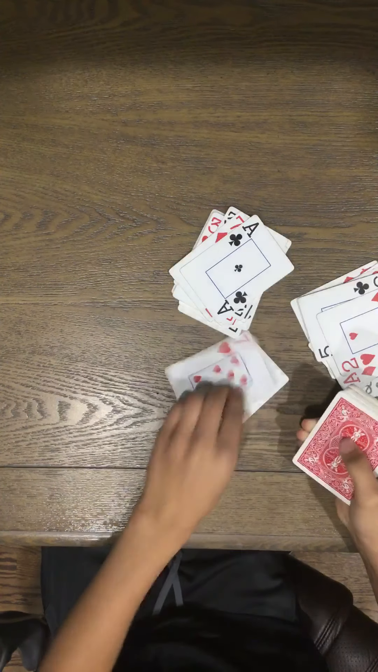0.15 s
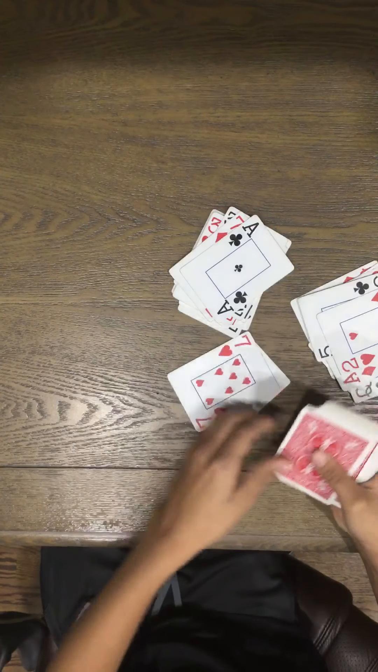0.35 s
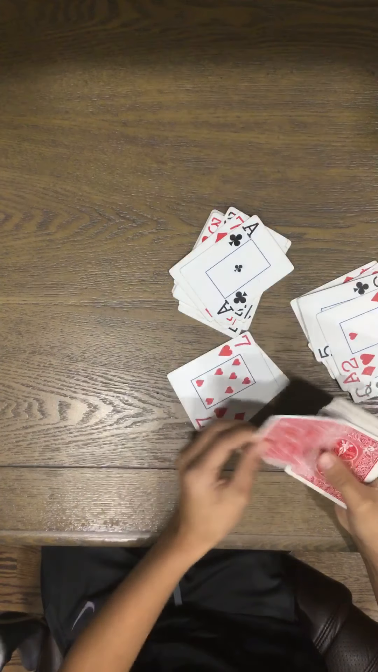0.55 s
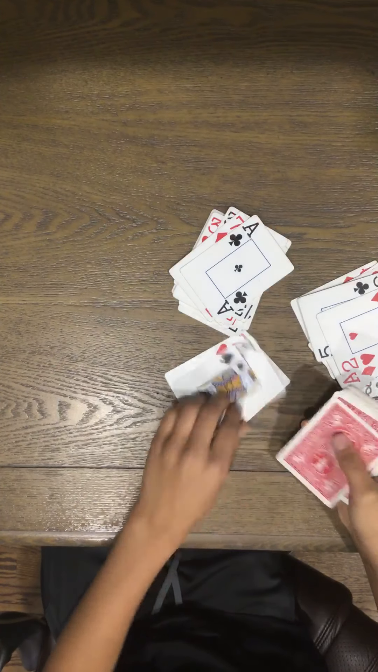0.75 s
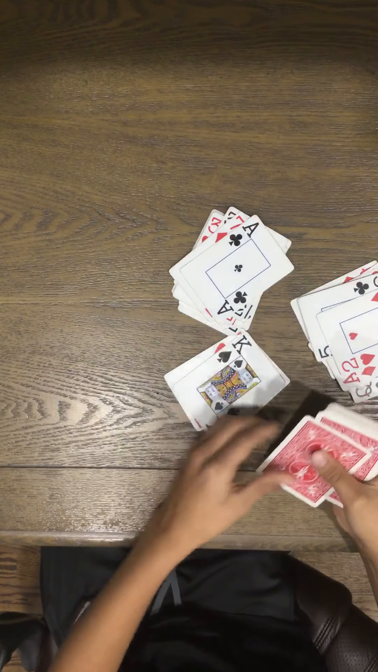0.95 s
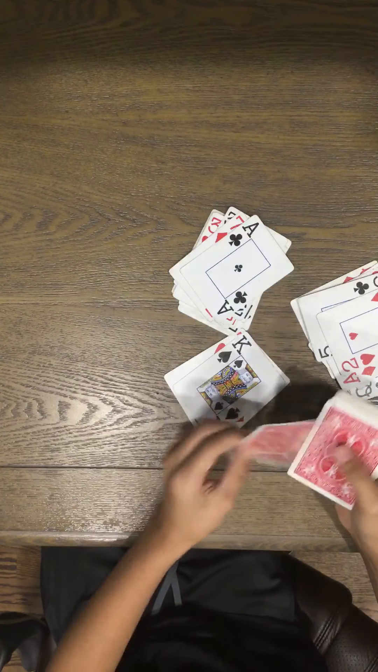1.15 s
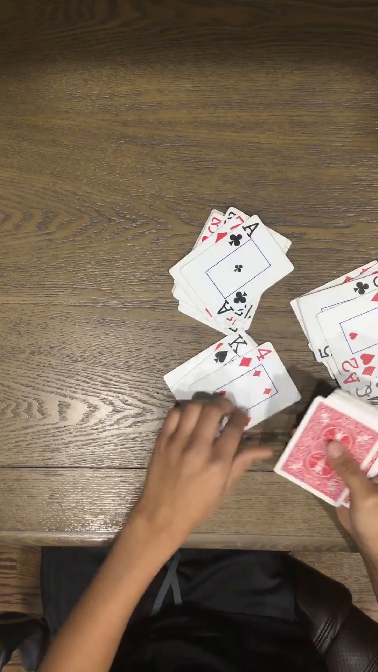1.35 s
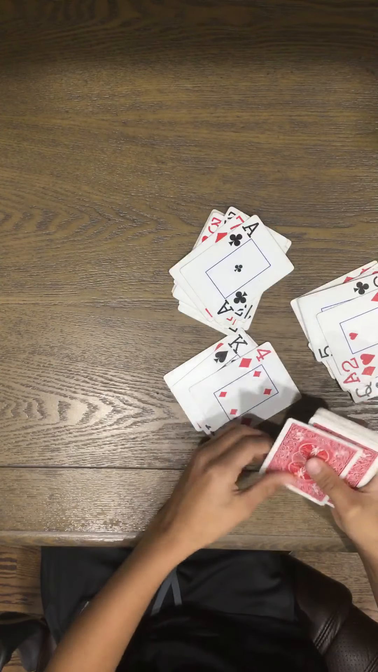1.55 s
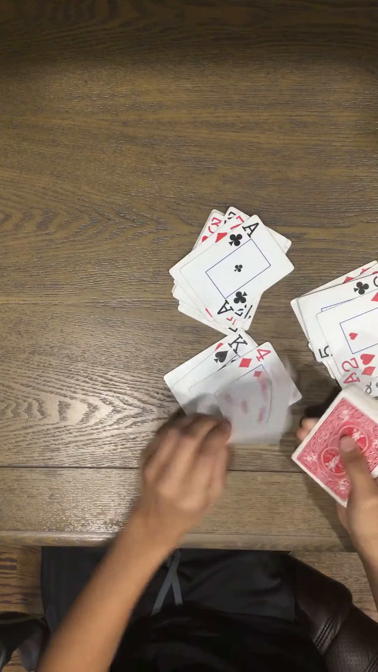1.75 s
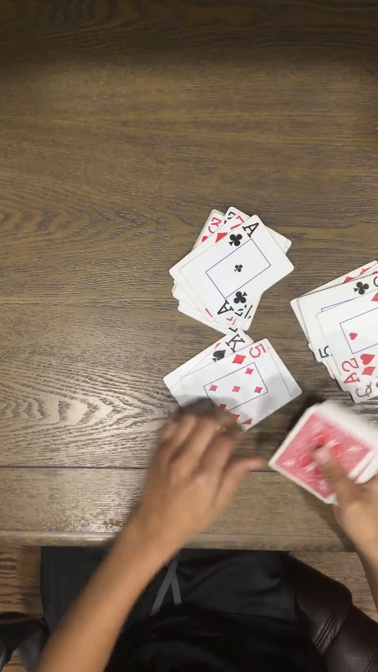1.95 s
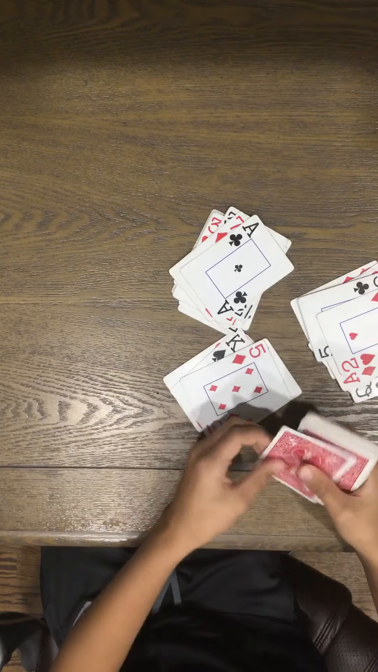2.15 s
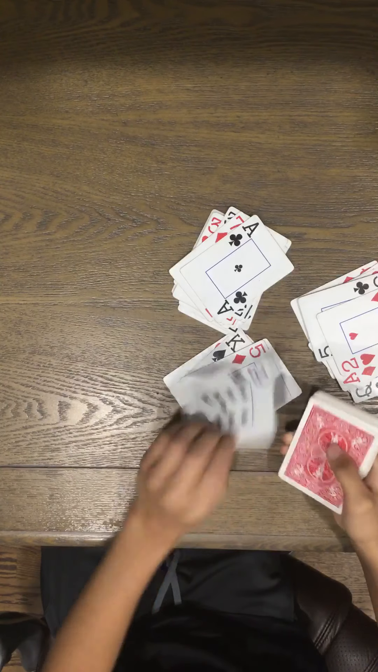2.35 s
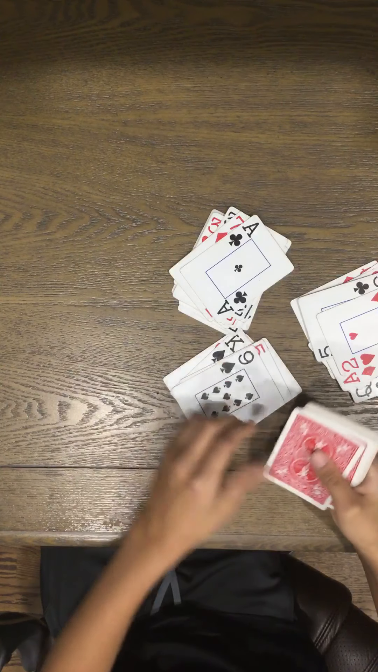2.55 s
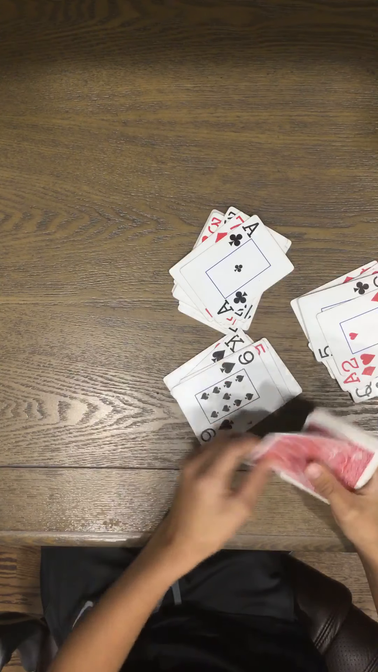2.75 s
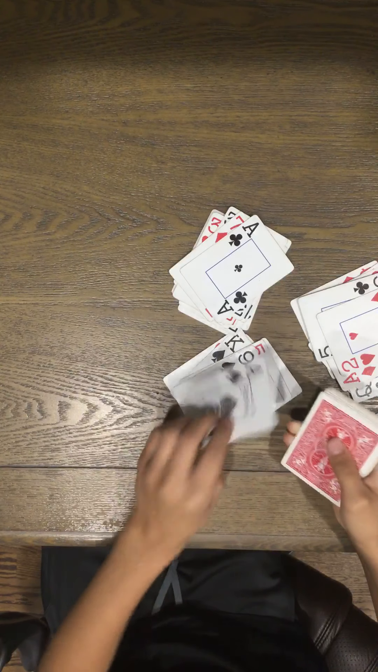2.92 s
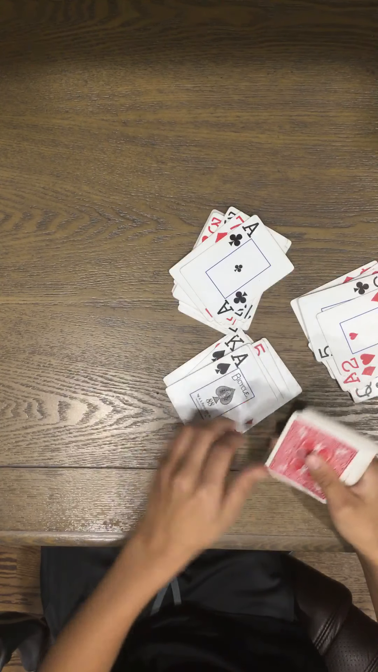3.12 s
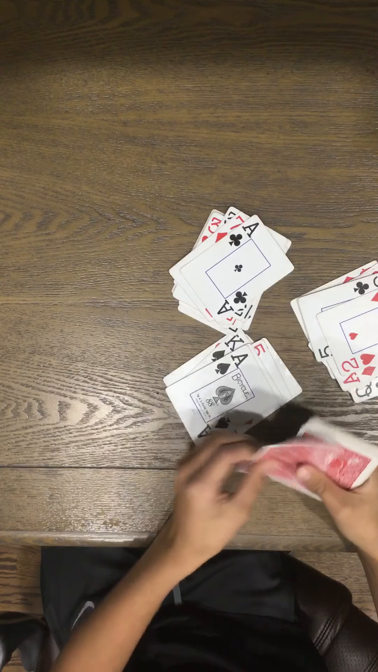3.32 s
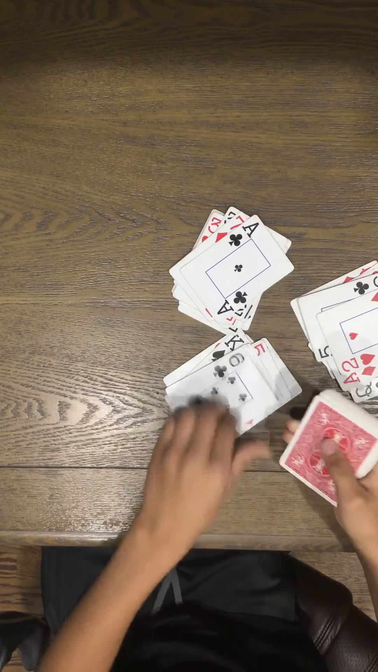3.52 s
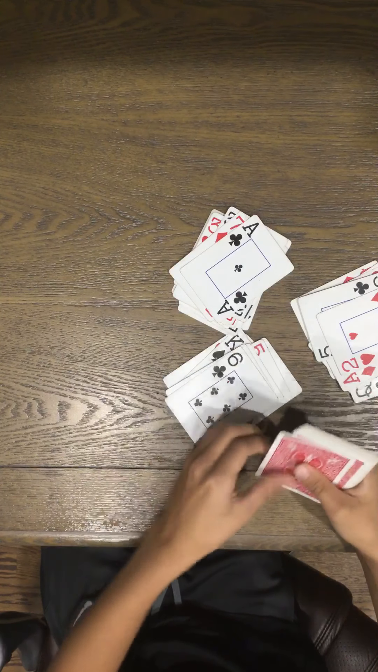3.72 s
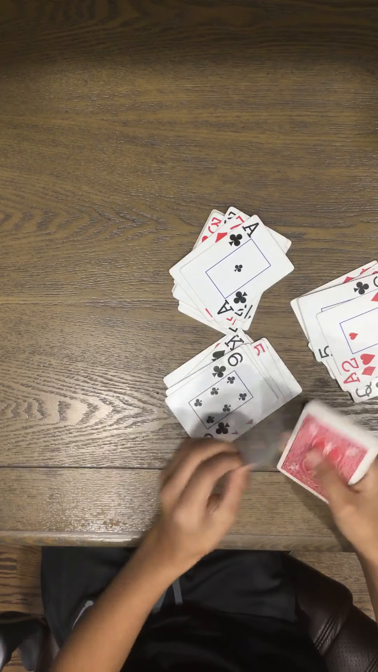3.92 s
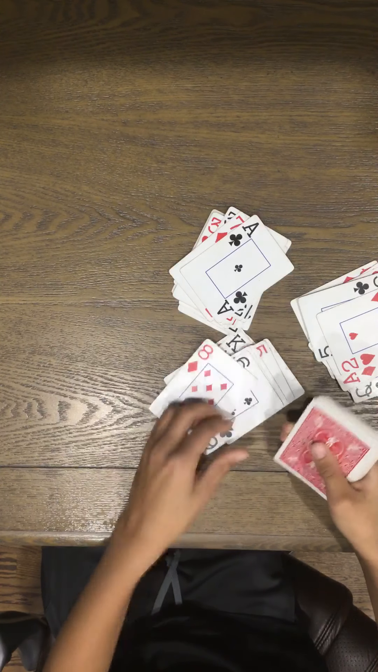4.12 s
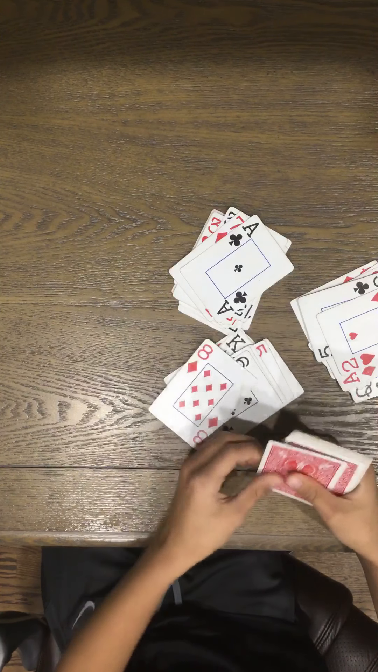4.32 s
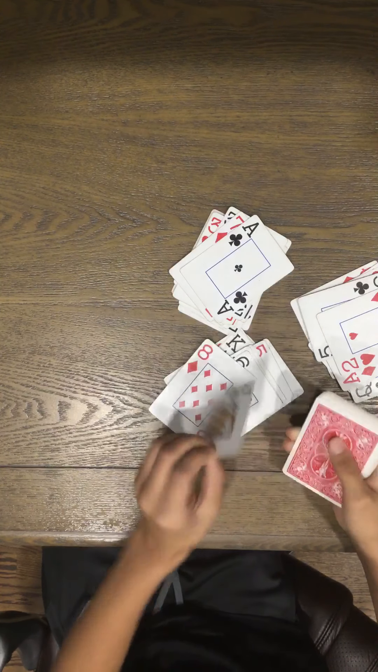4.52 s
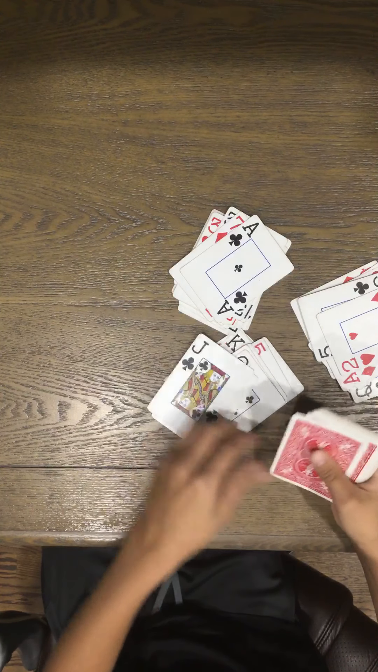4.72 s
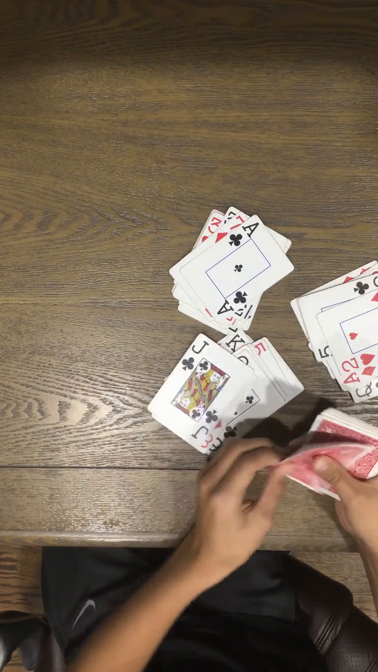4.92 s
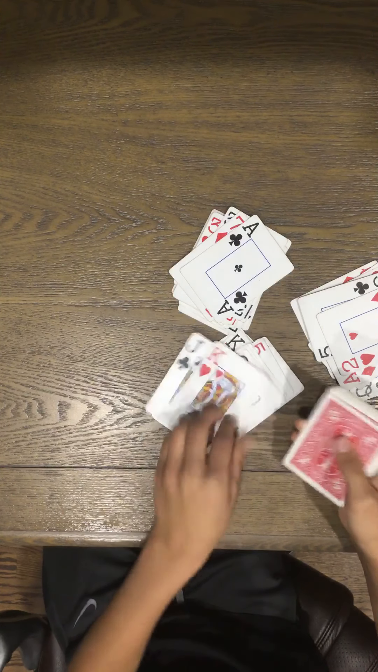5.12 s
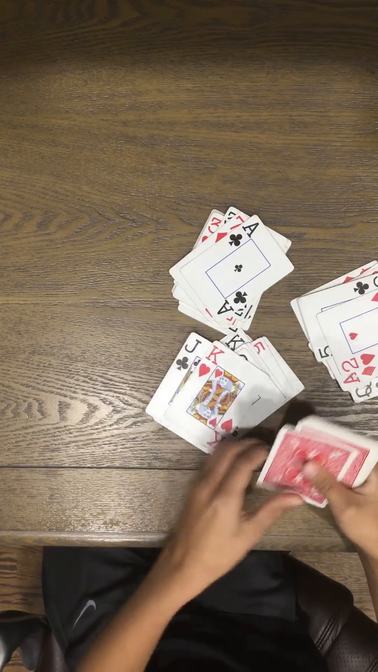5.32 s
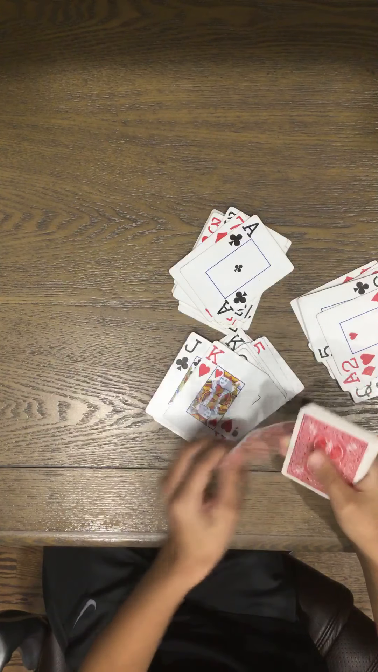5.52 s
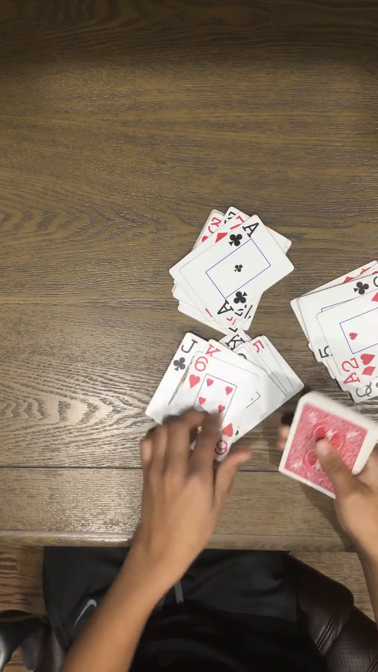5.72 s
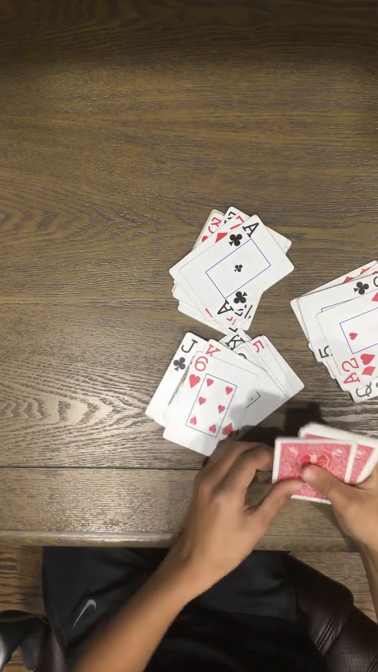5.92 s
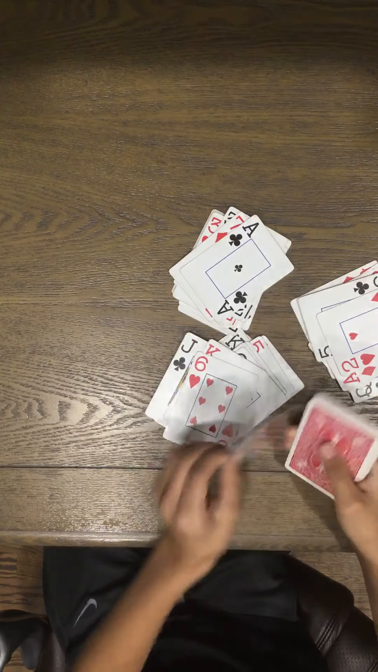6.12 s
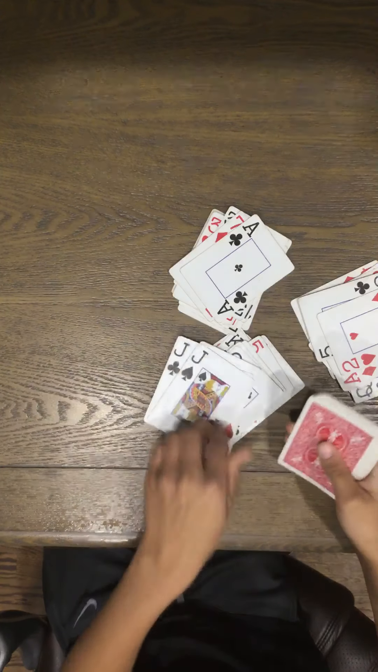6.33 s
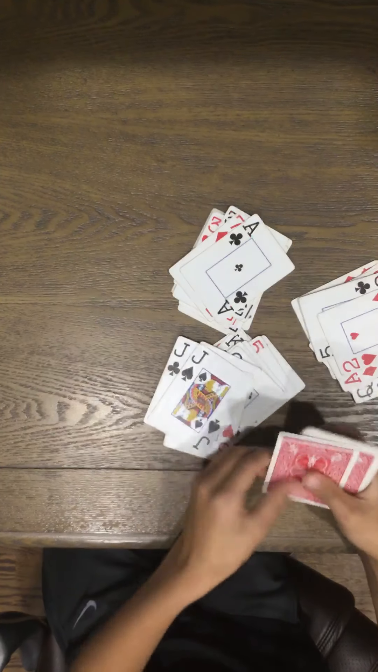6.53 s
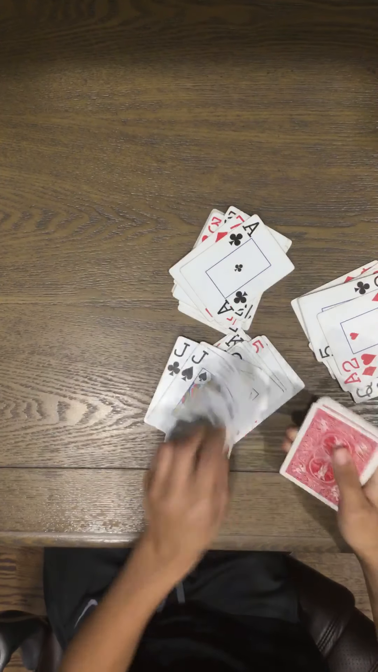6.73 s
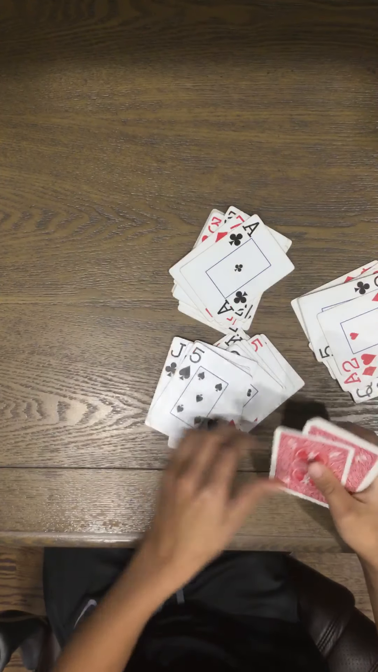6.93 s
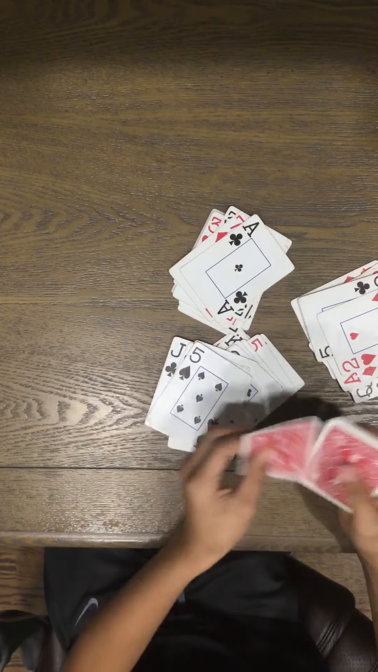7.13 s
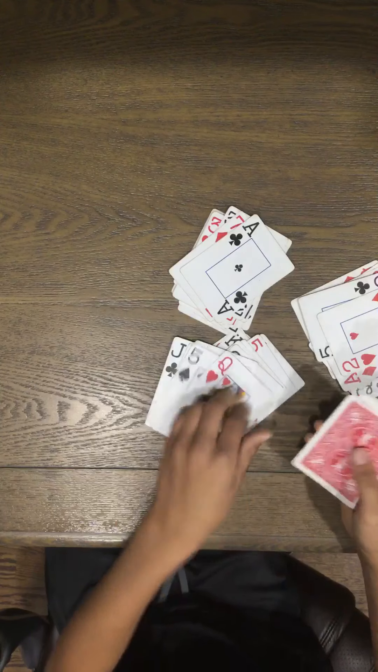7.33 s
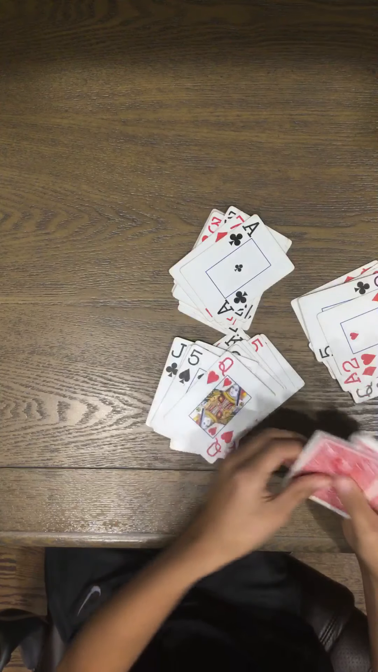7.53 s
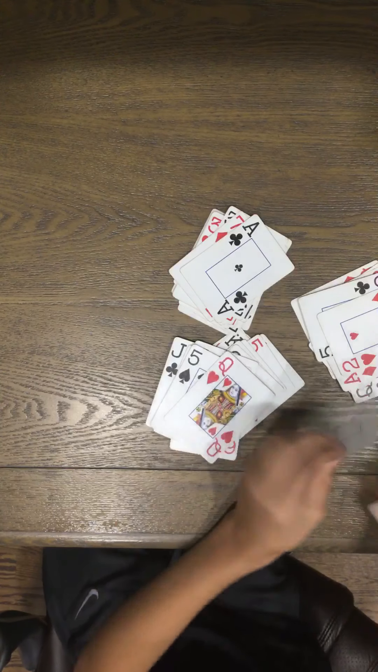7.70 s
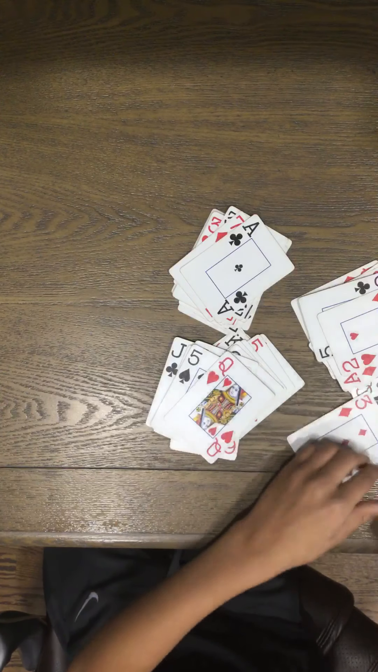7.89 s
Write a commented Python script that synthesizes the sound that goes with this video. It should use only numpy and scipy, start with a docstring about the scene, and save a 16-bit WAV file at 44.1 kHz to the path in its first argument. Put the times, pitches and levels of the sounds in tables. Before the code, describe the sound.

Playing cards are dealt one by one onto a wooden table, sliding, flicking and slapping down with soft finger thumps over a faint hum.

```python
"""A low hum fills a small quiet room, where playing cards are dealt one by one onto a wooden table.
First the thumb ticks on the deck. The top card slides off with a hiss, bends and flicks free,
nudging the table. Next its edge clicks against the pile, its face slaps down and its corner snaps.
Right behind it the fingers thump the table top, which rings briefly as the room's echo dies away."""
import sys
import numpy as np
from scipy import signal
from scipy.fft import rfft, irfft
from scipy.io import wavfile
from scipy.ndimage import uniform_filter1d

SR = 44100
rng = np.random.default_rng(int(sys.argv[2]) if len(sys.argv) > 2 else 0)


def materialize(psi):
    """Save the field psi as 16-bit PCM at rate SR to the path in sys.argv[1].

    A 1-D psi becomes a single channel; in a 2-D psi each row is a channel.
    """
    bounded = np.clip(np.atleast_2d(psi).T, -1, 1)
    quanta = np.round(bounded * 32767).astype(np.int16)
    wavfile.write(sys.argv[1], SR, quanta)


N = 351036
T = np.arange(N) / SR

# Table levels are relative. "Body" is the dull part of a sound, "sheen" the bright part,
# and "flex" the note of a bending card.
# the thumb pulls a card: (time [s], tick [dB], hiss [dB], rub [dB], fastest point of the pull [0-1])
CARD_PULLS = [(-.09, -60, -66, -60, 0.6), (.505, -61, -58.5, -65, 0.37), (1.073, -47, -68.5, -60.5, 0.2),
              (1.592, -49, -60.5, -67, 0.46), (2.176, -49, -66.5, -61.5, 0.44),
              (2.726, -64, -60, -63.5, 0.49), (3.260, -51, -48.5, -55.5, 0.88),
              (3.788, -44.5, -47.5, -68, 0.93), (4.369, -53.5, -66, -63.5, 0.26),
              (4.888, -42.5, -49, -63, 0.88), (5.424, -49.5, -48.5, -58, 0.81),
              (5.966, -52, -56.5, -64, .72), (6.585, -40.5, -54.5, -55, 0.51),
              (7.062, -48, -47, -59.5, 0.78), (7.589, -46.5, -49, -56.5, 0.55)]
# it springs free: (time [s], scrape [dB], flex [dB], click [dB], flex pitch [Hz], table nudge [dB])
CARD_FLICKS = [(.089, -65, -48.5, -35, 3050, -55.5), (.656, -45, -52, -41.5, 2700, -71),
               (1.214, -49.5, -68, -40, 3200, -41.5), (1.725, -48, -48, -49, 1250, -46.5),
               (2.329, -47, -44.5, -45, 2270, -53), (2.880, -60, -81, -42, 2800, -47.5),
               (3.445, -47.5, -58.5, -54, 2420, -53), (3.979, -46, -55, -58, 2150, -71),
               (4.532, -60, -78, -47, 3300, -58.5), (5.055, -45, -43.5, -53, 2150, -67),
               (5.579, -45, -52.5, -40, 2480, -49.5), (6.172, -48.5, -55, -35, 2300, -44.5),
               (6.723, -54, -69, -46, 2500, -49), (7.216, -62, -69, -42, 2230, -58.5),
               (7.728, -59.5, -84, -71, 1400, -53)]
# its face lands: (time [s], body [dB], sheen [dB], corner snap [dB], flex pitch [Hz])
CARD_LANDINGS = [(0.2192, -26, -39, -21.5, 5100), (0.8077, -27.5, -37, -27.5, 4000),
                 (1.3543, -30, -32, -44, 2480), (1.8781, -30, -38, -40, 3200),
                 (2.4789, -27, -32, -31.5, 3430), (3.0389, -34.5, -51, -35, 3000),
                 (3.582, -37.5, -32.5, -30.5, 2980), (4.1269, -41.5, -39, -41, 3200),
                 (4.675, -33.5, -36, -42, 2900), (5.1743, -36.5, -36, -36, 2900),
                 (5.7134, -29, -26.5, -27, 2560), (6.2938, -24, -32, -31, 2860),
                 (6.824, -31, -34, -32, 2960), (7.3705, -36.5, -30, -24, 3820),
                 (7.9175, -31.5, -33.5, -26.5, 4220)]


def undb(db):
    """Turn decibels into a gain to multiply by."""
    return 10 ** (np.asarray(db) / 20)


def unit(x):
    """Scale a sound to an average (rms) level of 1."""
    return x / np.sqrt(np.mean(x ** 2))


def along(hz, points):
    """Read between (frequency [Hz], value) points, with octaves evenly spaced."""
    f, value = np.transpose(points)
    return np.interp(np.log(np.maximum(hz, 1)), np.log(f), value)


def colour(x, points):
    """Shape a sound's tone to follow (frequency [Hz], level [dB]) points."""
    size = 4096
    cepstrum = irfft(np.log(undb(along(np.fft.rfftfreq(size, 1 / SR), points))))
    # fold it so the filter never rings before the sound starts
    cepstrum[1:size // 2] *= 2
    cepstrum[size // 2 + 1:] = 0
    return signal.fftconvolve(x, irfft(np.exp(rfft(cepstrum))))[:len(x)]


def resonate(x, hz, width_hz):
    """Keep the part of a sound near one pitch."""
    return signal.lfilter(*signal.iirpeak(hz, hz / width_hz, fs=SR), x)


def add(track, s, sound):
    """Mix a sound into the track at s seconds."""
    i = max(int(s * SR), 0)
    track[i:i + len(sound)] += sound[:max(N - i, 0)]


def wobble(size, smooth_samples):
    """A smooth random wavering."""
    return unit(uniform_filter1d(rng.standard_normal(size), size=smooth_samples))


def background(air_db=-57):
    """A low, wavering hum over faint air noise."""
    # the hum's notes: (pitch [Hz], half the filter width [Hz], level [dB])
    hum_notes = [(126.6, 10.7, -56.5), (227.4, 14.4, -68.5)]
    # still air in the room: (frequency [Hz], level [dB])
    air_tone = [(20, -58.5), (45, 9), (75, 7.5), (130, 17.5), (190, 1.5), (300, -3.5), (500, -12),
                (1400, -17.5), (2200, -25.5), (5000, -30), (13000, -32.5), (15500, -47)]
    hum = np.zeros(N)
    for hz, half_width, db in hum_notes:
        band = resonate(rng.standard_normal(N), hz, 2 * half_width)
        hum += undb(db) * unit(resonate(band, hz, 2 * half_width))
    return hum + undb(air_db) * unit(colour(rng.standard_normal(N), air_tone))


def room(x, wet_db, build_s=0.0009):
    """Add a small room's blurred echoes; treble and deep bass die before the middle."""
    # how long echoes last: (frequency [Hz], time to fade by 60 dB [s])
    fade_times = [(100, 0.25), (400, 0.58), (800, 0.44), (1600, 0.49), (4000, 0.35), (8000, 0.29),
                  (15000, 0.34)]
    # tone of the echoes: (frequency [Hz], level [dB])
    echo_tone = [(60, -9.5), (250, -8), (500, -4), (800, 1), (1400, 0.5), (2500, -2.5), (6000, -1.5),
                 (12000, -6), (16000, -9.5)]
    t = T[:int(SR * .7)]
    noise, hz = rfft(rng.standard_normal(len(t))), np.fft.rfftfreq(len(t), 1 / SR)
    edges = np.geomspace(30, SR / 2, 20)
    tail = np.zeros(len(t))
    for lo, hi in zip(edges, edges[1:]):
        band = irfft(noise * ((hz >= lo) & (hz < hi)), len(t))
        tail += band * np.exp(-np.log(1000) * t / along(np.sqrt(lo * hi), fade_times))
    tail *= 1 - np.exp(-t / build_s)
    tail = colour(tail / np.linalg.norm(tail), echo_tone)
    return x + undb(wet_db) * signal.fftconvolve(x, tail)[:N]


def table_top(blow, scatter_db=3.5, detune=0.0034):
    """The table rings after a blow, given as (frequency [Hz], level [dB]); each hits a new spot."""
    # the table's own notes: (pitch [Hz], level [dB], time to fade by 60 dB [s])
    table_notes = [(69, -14, .3), (84, -2, .22), (118, 0, .23), (143, -6, .27), (178, -1.5, .21),
                   (224, -15, .18), (241, -7, .22), (272, -11, .15), (312, -15, .15), (352, -14, .14),
                   (371, -6, .16), (410, -18, .1), (476, -10, .12), (535, -10, .12), (606, -10, .13),
                   (735, -21, .3), (832, -19, .28), (937, -25, .22), (1287, -28, .15)]
    t = T[:SR // 3]
    hz, note_db, fade_s = np.transpose(table_notes)
    level_luck, pitch_luck, sign_luck = rng.standard_normal((3, len(hz)))
    # the deepest notes swing against the next ones, so the boom builds slowly; the rest vary by spot
    direction = np.select([hz < 100, hz < 330], [1, -1], np.sign(sign_luck))
    gain = direction * undb(note_db + along(hz, blow) + scatter_db * level_luck)
    swing = np.sin(2 * np.pi * np.outer(hz * (1 + detune * pitch_luck), t))
    return gain @ (swing * np.exp(-np.log(1000) * np.outer(1 / fade_s, t)))


def table_thumps(thud_db=4, thud_hz=190, thud_s=0.0049, push_s=0.0019, wood_db=-7.5, wood_s=0.03):
    """Soft fingertips push the table in with a dull thud and leave it ringing; flicks nudge it too."""
    # fingers hit the table: (time [s], deep notes [dB], low notes [dB], middle notes [dB])
    finger_hits = [(.2222, -22.5, -24, -20.5), (.8105, -29.5, -26.5, -23), (1.3582, -20, -26, -26.5),
                   (1.8835, -14.5, -17.5, -21), (2.482, -23, -28.5, -24), (3.043, -23.5, -34.5, -30),
                   (3.585, -16.5, -30.5, -32.5), (4.130, -25, -40, -43), (4.678, -26.5, -25, -33.5),
                   (5.179, -22, -27.5, -27.5), (5.712, -29.5, -35.5, -42.5), (6.298, -17.5, -30, -24.5),
                   (6.827, -23, -26.5, -32.5), (7.371, -24.5, -27.5, -32.5), (7.919, -34, -39.5, -32)]
    # the wood's weaker notes, so close that they blur: (frequency [Hz], level [dB])
    wood_tone = [(120, -23.5), (260, -2.5), (450, 6.5), (800, -2), (1400, -13.5), (2200, -21),
                 (5000, -38.5)]
    out, t = np.zeros(N), T[:SR // 3]
    push = 1 - np.exp(-t / push_s)
    thud = -np.sin(2 * np.pi * thud_hz * t) * np.exp(-t / thud_s)
    for s, deep, low, middle in finger_hits:
        wood = unit(colour(rng.standard_normal(len(t)), wood_tone)) * np.exp(-t / wood_s)
        ring = table_top([(105, deep - 3), (200, low), (420, middle)])
        add(out, s, push * (ring + undb(low + thud_db) * thud + undb(middle + wood_db) * wood))
    for s, *_, nudge_db in CARD_FLICKS:
        add(out, s, push * table_top([(100, nudge_db - 5.5), (400, nudge_db + 1)]))
    # a board gives off hardly any sound below its lowest note
    return signal.sosfilt(signal.butter(2, 40, "high", fs=SR, output="sos"), out)


def grains(size, spread_db):
    """Paper fibres touch in a dense run of tiny, uneven clicks."""
    return unit(rng.standard_normal(size) * undb(spread_db * np.minimum(rng.standard_normal(size), 2.5)))


def paper_ring(hz, width_hz):
    """Rubbing keeps a card ringing with a rough note that follows the pitch curve hz."""
    noise = rng.standard_normal((2, len(hz)))
    a, b = signal.sosfilt(signal.butter(2, width_hz / 2, fs=SR, output="sos"), noise)
    phase = 2 * np.pi * np.cumsum(hz) / SR
    return unit(a * np.cos(phase) + b * np.sin(phase))


def card_slides(catch_db=2, rub_db=-4, patchy_db=2, grip_spread=0.1,
                falter_octaves=.08, max_bend_octaves=1.1, bend_s=.028):
    """Card slides on card: it hisses more as it speeds up and rubs harder as it bends."""
    # tone of the hiss: (frequency [Hz], level [dB])
    hiss_tone = [(1500, -13), (3000, -2.5), (5000, -4.5), (7000, -2), (10000, 0.5), (12500, -0.5),
                 (14000, -4.5), (15800, -12)]
    # tone of the rubbing: (frequency [Hz], level [dB])
    rub_tone = [(100, 6), (380, 11), (520, -16), (730, -22), (1080, 5), (1270, 6), (1430, 21.5),
                (2050, -14.5), (3000, -0.5), (4200, -7.5), (6000, 9.5), (12000, -2)]
    # a sliding card's notes before bending raises them: (pitch [Hz], width [Hz], level [dB])
    card_notes = [(1124, 65, 0), (1530, 150, -4), (2410, 1100, -1), (3260, 2600, -6.5)]
    out, size = np.zeros(N), SR // 3
    hiss_hz, hiss_shape = np.transpose(hiss_tone)
    for (start, _, hiss_level, rub_level, fastest), (free, *_) in zip(CARD_PULLS, CARD_FLICKS):
        t = T[(T >= start) & (T < free)]
        progress = (t - start) / (free - start)
        speed = np.interp(progress, [0, fastest, 1], [0, 1, 0])
        bent = np.interp(progress, [0, .86, 1], [0, 1, .5])
        grip = np.exp(grip_spread * rng.standard_normal())
        remaining_s = np.maximum(free - t[0] - T[:size], 0)
        # the notes shoot up just before the card comes free, and falter as it catches
        depth = max_bend_octaves * rng.random()
        falter = falter_octaves * wobble(size, smooth_samples=500)
        pitch_ratio = grip * 2 ** (depth * np.exp(-remaining_s / bend_s) + falter)
        fibres = grains(size, spread_db=2.5)
        patchy_shape = hiss_shape + patchy_db * rng.standard_normal(len(hiss_hz))
        hiss = unit(colour(fibres, np.transpose([hiss_hz, patchy_shape])))
        rub = unit(colour(grains(size, spread_db=6.5), rub_tone))
        rub += sum(undb(db + 1) * paper_ring(hz * pitch_ratio, width) for hz, width, db in card_notes)
        catch = undb(catch_db * wobble(size, smooth_samples=220))
        add(out, start, undb(hiss_level) * speed ** 2.93 * (catch * hiss)[:len(t)])
        add(out, start, undb(rub_level + rub_db) * bent ** 2.64 * (catch * rub)[:len(t)])
    return out


def card_flicks(glide=0.0815, lead_s=.03, rise_s=0.006, fall_s=0.0056, scrape_db=1, flex_db=3):
    """The back edge scrapes off the deck and the bent card springs straight, its pitch rising."""
    # tone of the scrape: (frequency [Hz], level [dB])
    scrape_tone = [(80, -12), (200, 18.5), (400, 8.5), (800, -0.5), (1400, 10.5), (3500, 13.5), (6000, 4.5),
                   (12000, 1), (15500, -6)]
    out, t = np.zeros(N), T[:SR // 8] - lead_s
    swell = np.exp(np.minimum(t / rise_s, -t / fall_s))
    pitch_ratio = 1 + glide * np.tanh(t / fall_s)
    for s, scrape, flex, _, hz, _ in CARD_FLICKS:
        rasp = undb(scrape + scrape_db) * unit(colour(grains(len(t), spread_db=6), scrape_tone))
        ring = undb(flex + flex_db) * paper_ring(hz * pitch_ratio, width_hz=350)
        add(out, s - lead_s, swell * (rasp + ring))
    return out


def card_contact(force, body_db, sheen_db, flex_hz, flex, patchy_db=1.67):
    """A touch sounds through the card's flex, body and surface; every bend changes the tone a little."""
    hz = np.geomspace(600, 16000, 36)
    db = along(hz, [(2800, body_db), (7500, sheen_db)]) + patchy_db * rng.standard_normal(len(hz))
    return colour(force + flex * resonate(force, flex_hz, width_hz=900), np.transpose([hz, db]))


def click_events(thumb_hz=1390, corner_lag_s=0.0014, free_body_db=5.5, corner_body_db=-12):
    """A deal clicks up to four times: thumb, card coming free, front edge, corner."""
    # the front edge touches the pile: (time [s], body [dB], sheen [dB], flex pitch [Hz])
    edges = [(0.1784, -30.5, -39, 1140), (.769, -35.5, -30.5, 1460), (1.325, -34.5, -32.5, 1520),
             (1.866, -27, -35, 2570), (2.4521, -26, -35.5, 1370), (3.0251, -32, -35.5, 2500),
             (3.571, -30.5, -35, 1500), (4.1168, -30.5, -40.5, 2740), (4.656, -33, -41, 2680),
             (5.154, -20.5, -29.5, 1890), (5.6797, -30, -39, 1400), (6.267, -31, -41.5, 2860),
             (7.355, -24, -33.5, 2500), (7.879, -50, -50, 1530)]
    thumb = [(s, db, db, thumb_hz) for s, db, *_ in CARD_PULLS if s > 0]
    free = [(s, db + free_body_db, db, hz) for s, _, _, db, hz, _ in CARD_FLICKS]
    corner = [(s + corner_lag_s, db + corner_body_db, db, hz) for s, _, _, db, hz in CARD_LANDINGS]
    return thumb + free + edges + corner


def card_clicks(chatter=0.084, chatter_s=0.0013, brush_s=0.0014, drag=0.035, drag_s=0.015,
                flap_hz=1300, boost_db=21, snap_db=-29):
    """A stiff edge brushes in, strikes, chatters and drags on while the card flaps."""
    # tone of a click: (frequency [Hz], level [dB])
    click_tone = [(200, -22.5), (700, -9.5), (1400, -11.5), (3000, -12.5), (5000, -11.5), (7000, -6.5),
                  (10000, -9.5), (12500, -7), (15500, -24)]
    lead = SR // 100
    out, t = np.zeros(N), T[:SR // 10] - lead / SR
    for s, body, sheen, flex_hz in click_events():
        scrape = drag * (t > 0) * np.exp(-t / drag_s) * rng.standard_normal(len(t))
        rattle = chatter * np.exp(np.minimum(t / brush_s, -t / chatter_s)) * grains(len(t), spread_db=4)
        flap = 1.4 * resonate(scrape, flap_hz, width_hz=570)
        # only hard hits snap cleanly
        hardness = np.clip(undb(sheen - snap_db), .2, 1.3)
        force = (rattle + scrape + flap) / max(hardness, 1)
        force[lead] += hardness
        add(out, s + t[0], card_contact(force, body + boost_db, sheen + boost_db, flex_hz, flex=2.38))
    return colour(out, click_tone)


def card_slaps(lead_s=.03, rise_s=0.0015, fall_s=0.0052, skim_s=0.0077, skim_db=-14, boost_db=7):
    """The card skims over the pile, then its face closes on it in a short crackle."""
    # tone of a slap: (frequency [Hz], level [dB])
    slap_tone = [(150, -39.5), (600, -6.5), (1400, -1), (1900, -11.5), (2600, -8.5), (4500, -8.5),
                 (7000, -10.5), (10000, -13.5), (12500, -11), (15500, -30)]
    out, t = np.zeros(N), T[:SR // 8] - lead_s
    after = np.maximum(t, 0)
    closing = (1 - np.exp(-after / rise_s)) * np.exp(-after / fall_s)
    skim = undb(skim_db) * np.exp(-abs(t) / skim_s)
    for s, body, sheen, _, flex_hz in CARD_LANDINGS:
        force = (closing / closing.max() + skim) * grains(len(t), spread_db=12)
        add(out, s - lead_s, card_contact(force, body + boost_db, sheen + boost_db, flex_hz, flex=0.98))
    return colour(out, slap_tone)


def scene():
    """Mix table, pile and deck, each with its share of echo, over the hum."""
    table = room(table_thumps(), wet_db=-13.5, build_s=0.033)
    pile = room(card_slaps() + card_clicks(), wet_db=-8.5)
    deck = room(card_slides() + card_flicks(), wet_db=-3.5)
    return (table + pile + deck + background())[None]


def record(dry):
    """Cut the highest treble, above 16000 Hz."""
    return signal.sosfilt(signal.ellip(8, .2, 70, 16000, fs=SR, output="sos"), dry)


dry = scene()
out = record(dry)
materialize(out)
```